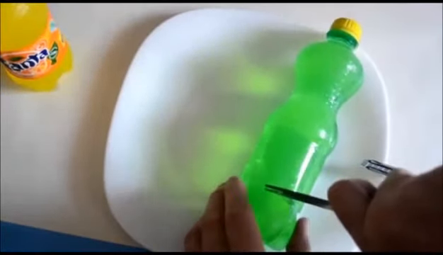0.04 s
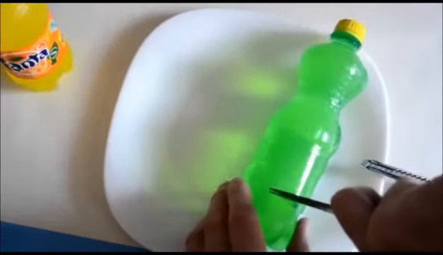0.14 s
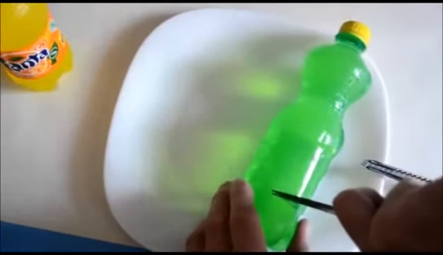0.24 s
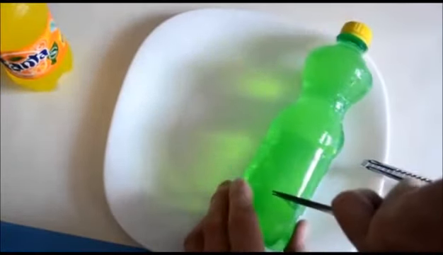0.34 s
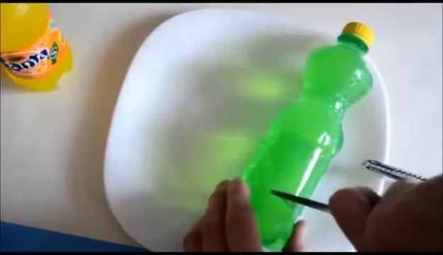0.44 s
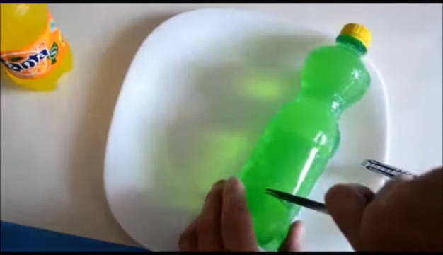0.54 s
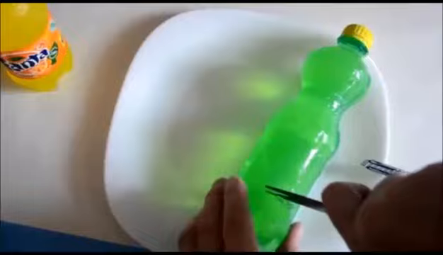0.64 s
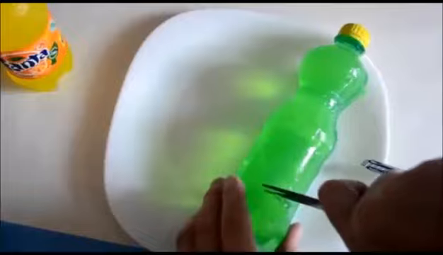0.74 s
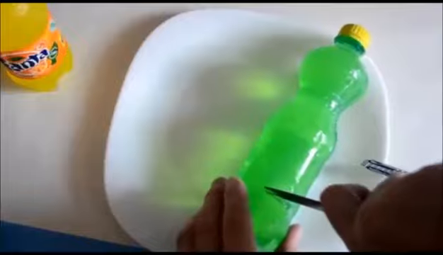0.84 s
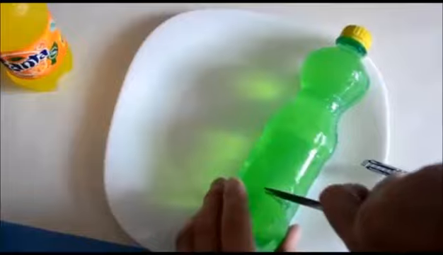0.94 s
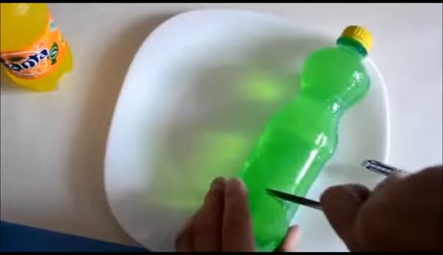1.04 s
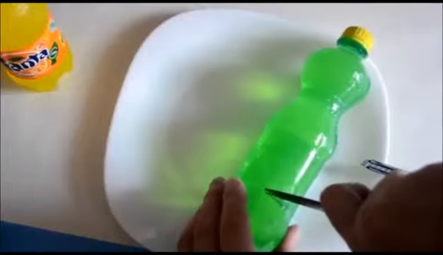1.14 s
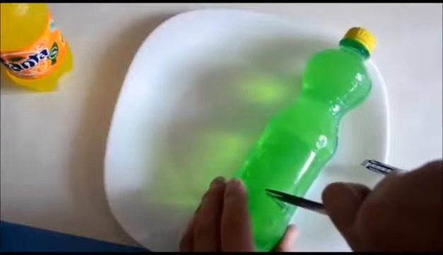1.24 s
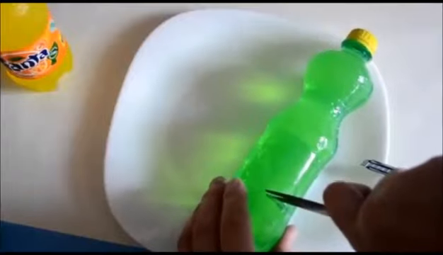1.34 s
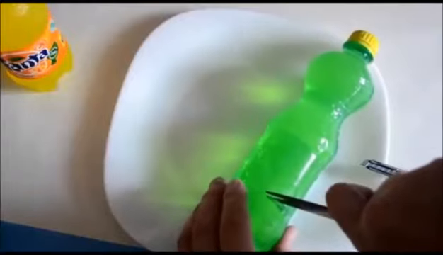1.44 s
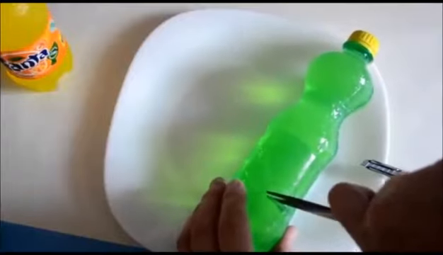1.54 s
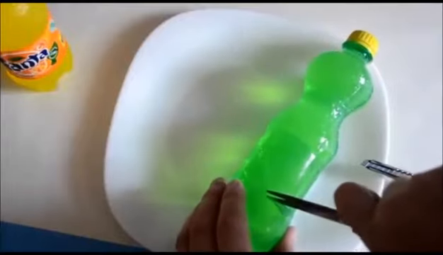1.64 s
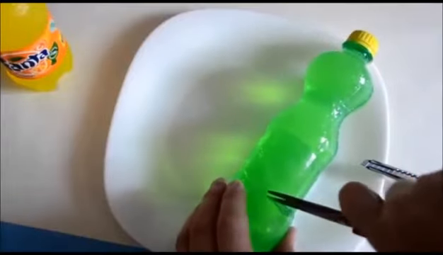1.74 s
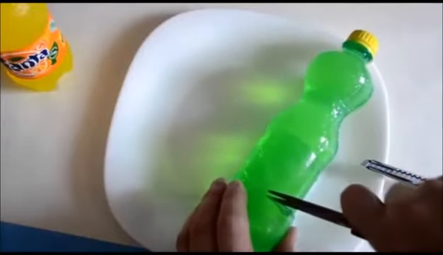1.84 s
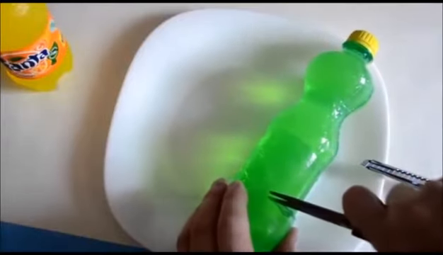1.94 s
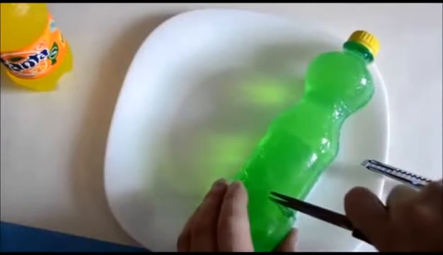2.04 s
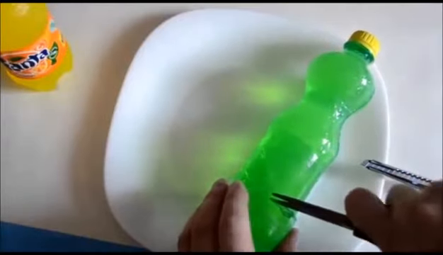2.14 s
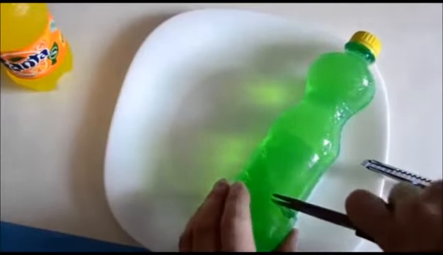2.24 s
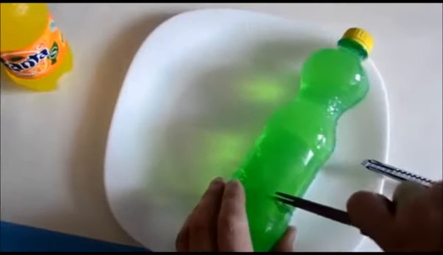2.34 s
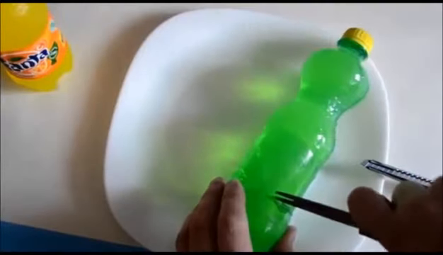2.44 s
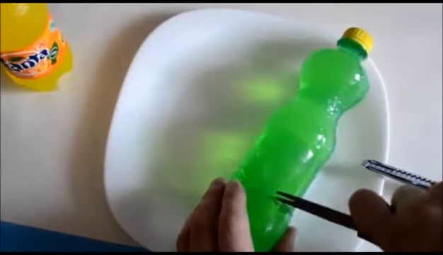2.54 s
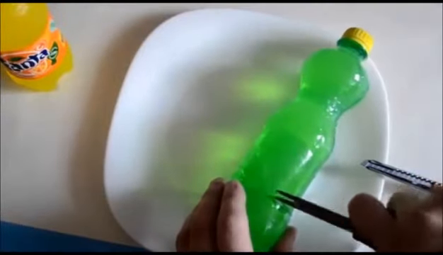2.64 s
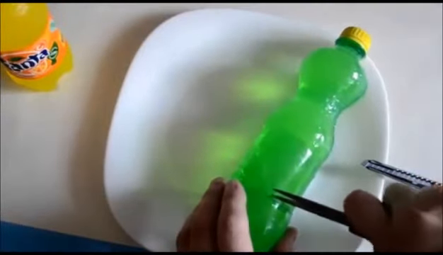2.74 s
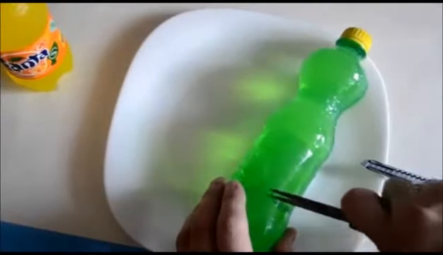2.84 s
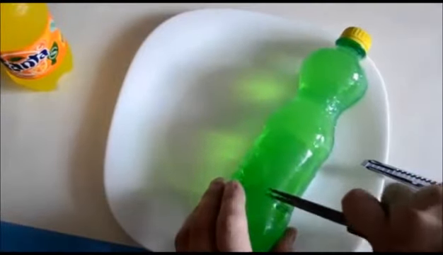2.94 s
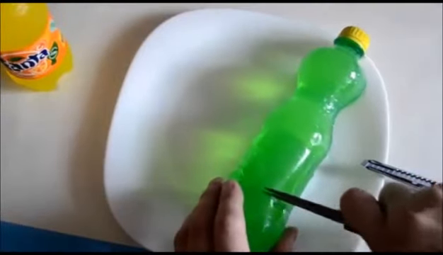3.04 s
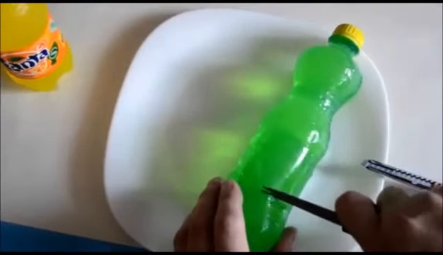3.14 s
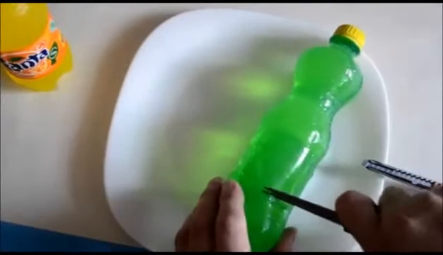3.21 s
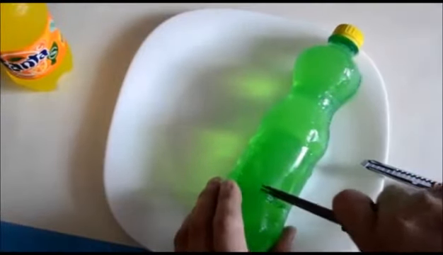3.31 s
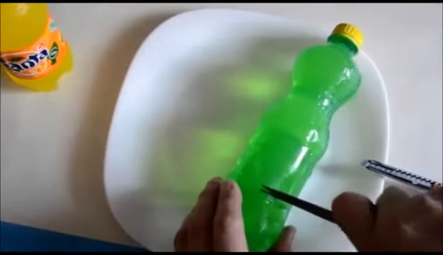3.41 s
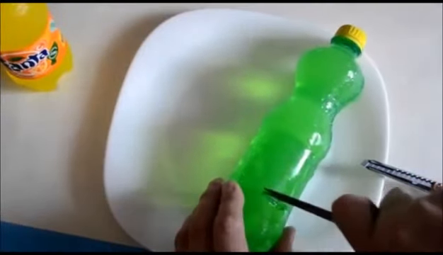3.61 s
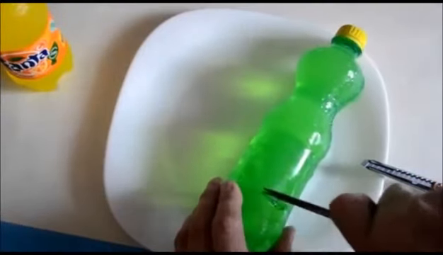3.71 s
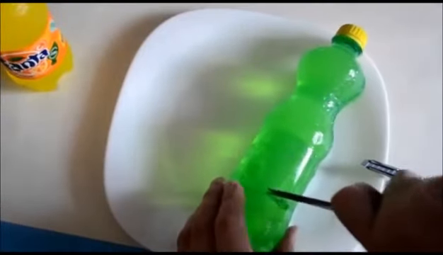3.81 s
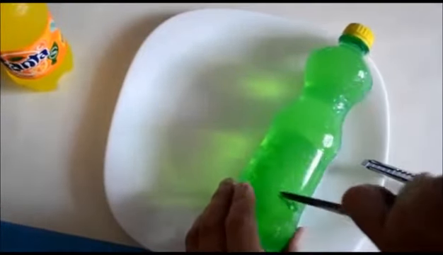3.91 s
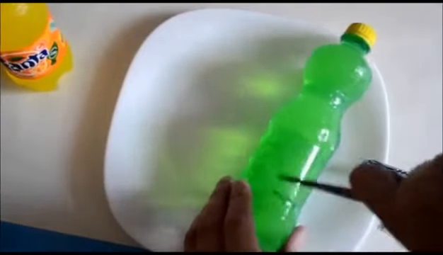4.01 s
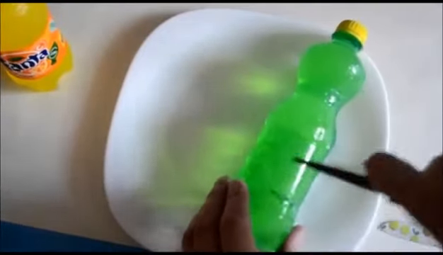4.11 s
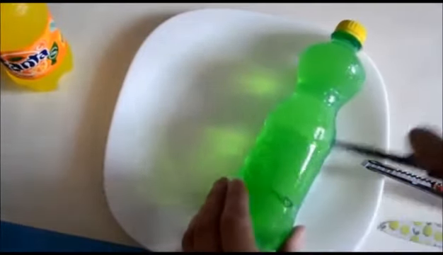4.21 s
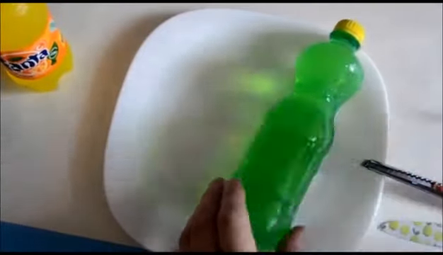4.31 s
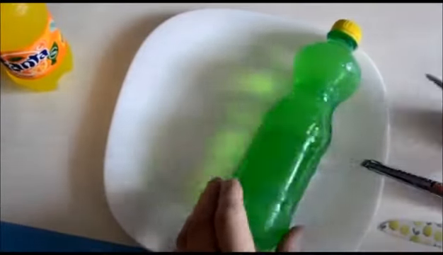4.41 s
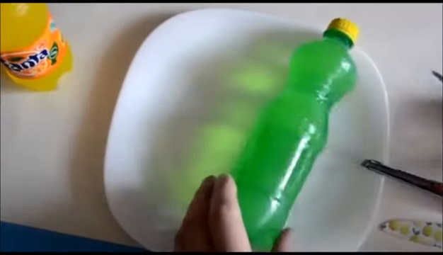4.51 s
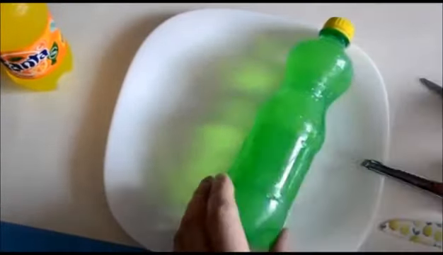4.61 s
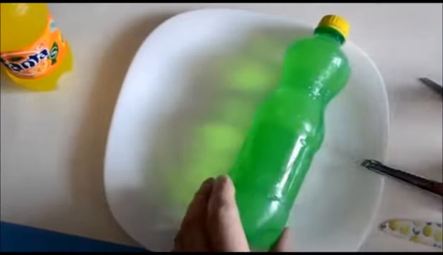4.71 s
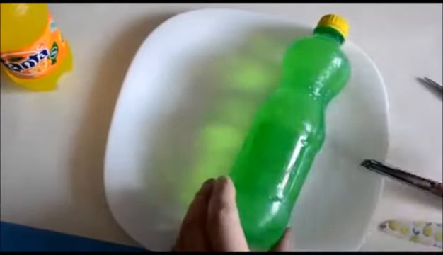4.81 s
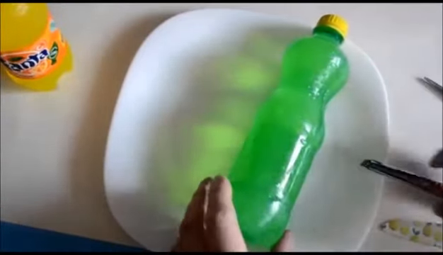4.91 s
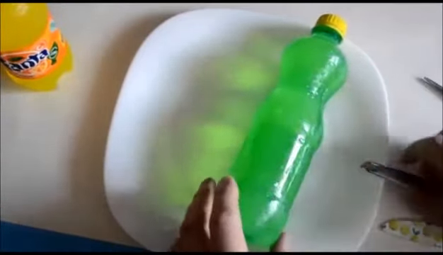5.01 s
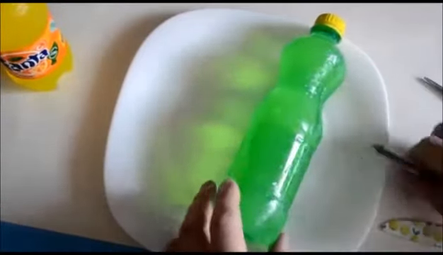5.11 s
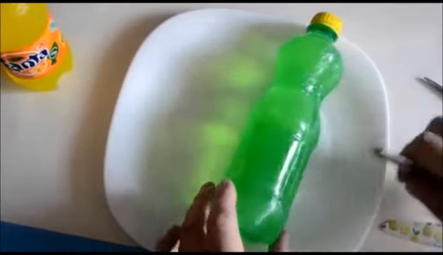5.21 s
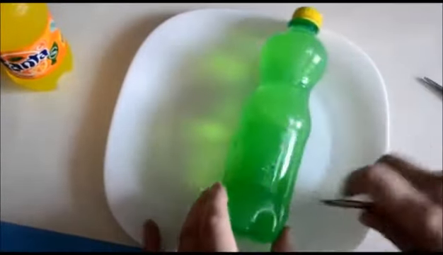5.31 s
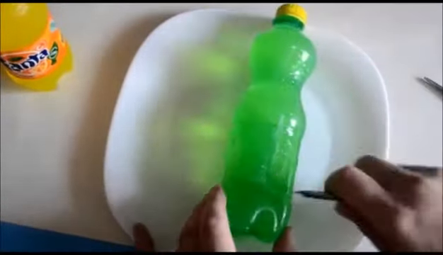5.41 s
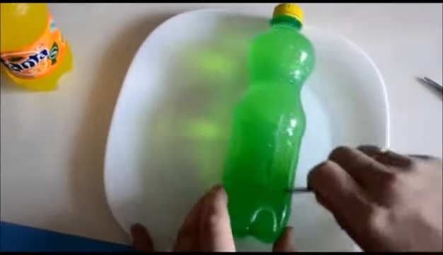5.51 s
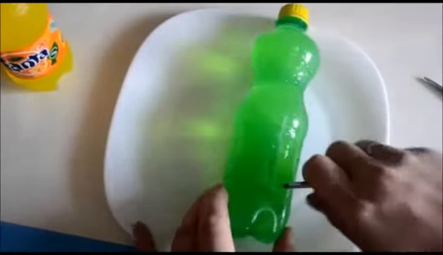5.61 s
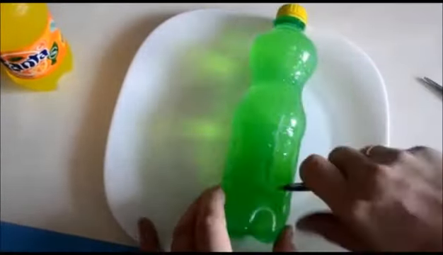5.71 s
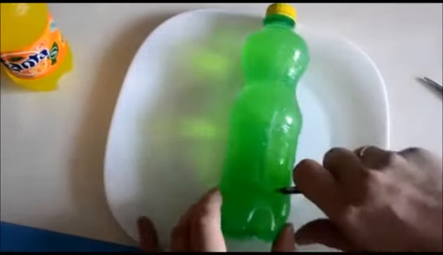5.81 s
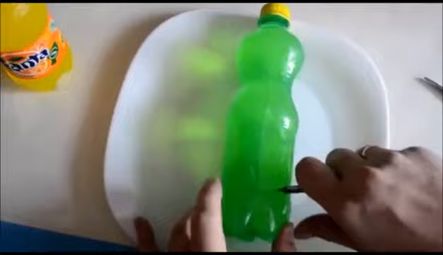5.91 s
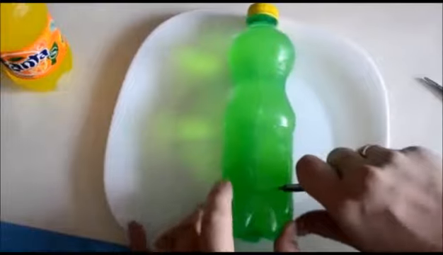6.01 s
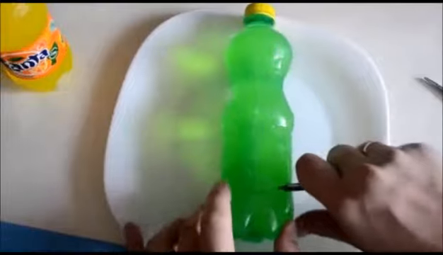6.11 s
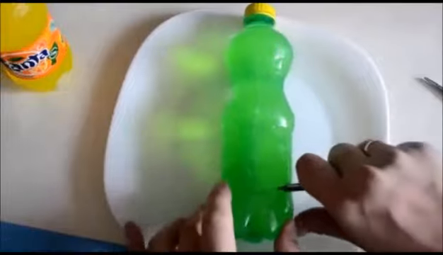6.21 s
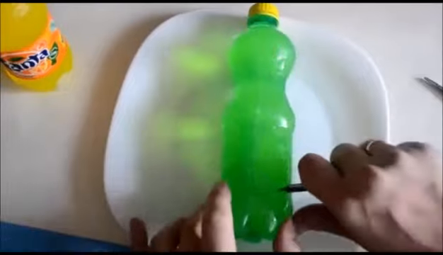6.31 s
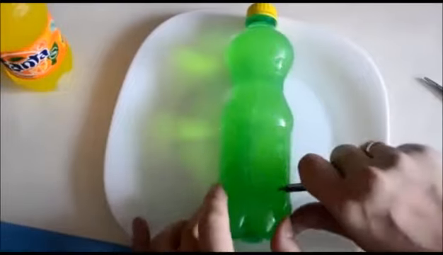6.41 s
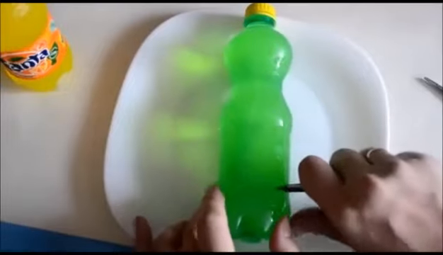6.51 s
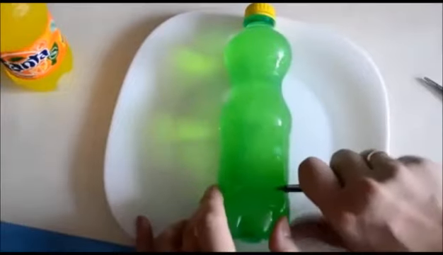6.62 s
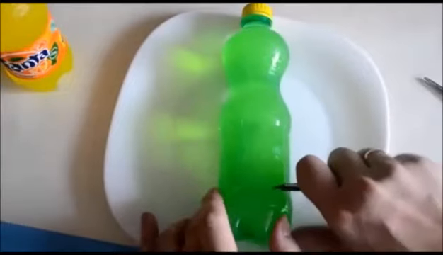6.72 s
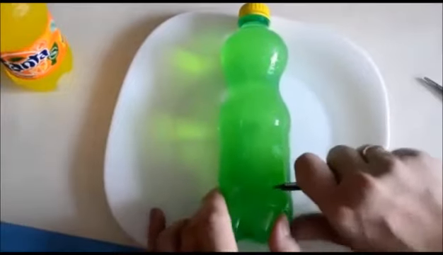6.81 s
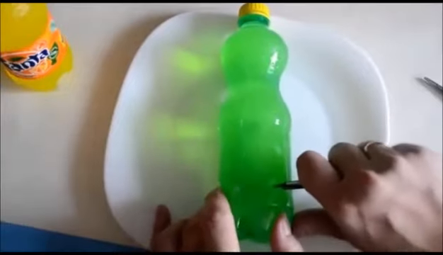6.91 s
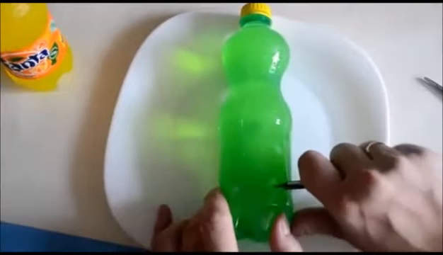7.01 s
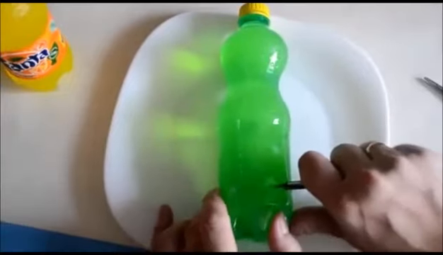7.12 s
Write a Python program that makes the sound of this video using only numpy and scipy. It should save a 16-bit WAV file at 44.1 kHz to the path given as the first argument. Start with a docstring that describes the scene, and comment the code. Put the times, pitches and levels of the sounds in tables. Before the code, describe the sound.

Sparse plastic pops and tiny scraping rasps sit over a low, steady room hiss. A strong snap comes early, then light ticks, a scissor clack and soft bottle bumps. Midway, scissors clatter onto a hard table, by far the loudest moment. A light brush and a thin steel click follow, then clustered crisp cracks as a knife enters the plastic. A small nearby microphone catches short indoor echoes.

```python
"""In a quiet room with a faint hum, small scissors snip the thin wall of a jelly-filled plastic bottle on a plate.
The wall gives way in short snaps and rasps, made by brief pushes or trains of slips ringing three resonances.
The heavy bottle thumps softly as it is shifted, and the scissors slide shut and clack: struck sets of modes.
Then the scissors are laid on the table in a run of knocks, ringing the table top, handles and blades.
A craft knife is picked up, its steel clicks, and it is pushed into the cut with more snaps and rasps."""
import sys
import numpy as np
from scipy import signal
from scipy.fft import rfft, irfft
from scipy.io import wavfile
from scipy.ndimage import uniform_filter1d

SR = 44100
rng = np.random.default_rng(int(sys.argv[2]) if len(sys.argv) > 2 else 0)


def to_wav(s):
    """Save 16-bit WAV."""
    ch = np.atleast_2d(s).T  # columns
    pcm = np.round(np.clip(ch, -1, 1) * 32767)  # PCM
    wavfile.write(sys.argv[1], SR, pcm.astype(np.int16))


N = 315315
CUTOFF_HZ = 11200   # about where the microphone stops hearing


def from_db(db):
    """Turns decibels into an amplitude factor."""
    return 10 ** (np.asarray(db) / 20)


def rms_one(x):
    """Scales a sound to an rms level of 1."""
    return x / np.sqrt(np.mean(x ** 2) + 1e-20)


def one_ms(x):
    """Scales a sound to the energy of one millisecond at rms 1."""
    return x * np.sqrt(SR / 1000 / (np.sum(x ** 2) + 1e-20))


def seconds(length):
    """The time of each sample, in seconds."""
    return np.arange(int(length * SR)) / SR


def at_hz(points, hz):
    """Reads a table between its rows, on a log-frequency axis."""
    points = np.array(points)
    return np.interp(np.log(np.maximum(hz, 1)), np.log(points[:, 0]), points[:, 1])


def cut(x, hz, kind):
    """Removes what lies above ("low") or below ("high") a frequency."""
    return signal.sosfilt(signal.butter(2, hz, kind, fs=SR, output="sos"), x)


def resonate(x, hz, quality):
    """Passes a sound through one resonance; a higher quality is narrower and rings longer."""
    b, a = signal.iirpeak(hz, max(quality, 1), SR)
    return signal.lfilter(b, a, x + 1e-18)


def add(track, s, sound):
    """Mixes a sound into the track at time s."""
    start = int(s * SR)
    track[start:start + len(sound)] += sound[:N - start]


def contact(rattle_s, rattle_db):
    """One sharp push and a quickly dying chatter of micro-slips, made equally strong at all frequencies."""
    t = seconds(.08)
    slips = rng.standard_normal(len(t)) * np.exp(-t / rattle_s)
    click = 1. * (t == 0)
    spectrum = rfft(one_ms(click) + from_db(rattle_db) * one_ms(slips))
    flat = irfft(spectrum / np.abs(spectrum), len(t))
    return flat[:len(t) // 2]


def strike(modes, push):
    """A push rings every mode of an object; neighbouring modes swing in opposite directions."""
    t, out = seconds(.3), 0
    for k, (hz, db, t60) in enumerate(modes):
        ring = np.sin(2 * np.pi * hz * t) * from_db(-60 * t / t60)
        out = out + (-1) ** k * from_db(db) * one_ms(ring)
    return one_ms(signal.fftconvolve(push, out))


def taps(events, modes, soft_hz, low_hz):
    """Light single blows on one object: no treble above soft_hz, and too small to radiate below low_hz."""
    out = np.zeros(N)
    for s, db in events:
        sound = strike(modes, contact(rattle_s=0.0043, rattle_db=3))
        sound = cut(cut(sound, soft_hz, "low"), low_hz, "high")
        add(out, s, from_db(db) * one_ms(sound))
    return out


# The tone of the room air. Each row: pitch in Hz, relative strength in dB.
AIR_TONE = [(25, -18), (60, -10.5), (100, -7), (135, -6), (180, -1.5), (400, -0.5), (1000, -3),
            (1800, -7.5), (2800, -10), (4700, -14.5), (6500, -21.5), (9500, -26), (11500, -36.5)]
# Faint steady whines in the air. Each row: pitch in Hz, width in Hz, level in dB.
AIR_WHINES = [(135, 2.7, -77), (393.6, 4.8, -79.5), (2228, 110, -79), (2658, 84, -77.5), (3040, 60, -77.5),
              (4500, 200, -78.5)]
AIR_DB = -63


def air():
    """Steady hiss with a low hum and a few narrow whines, all shaped from random noise."""
    hz = np.arange(N // 2 + 1) * SR / N
    hiss = irfft(rfft(rng.standard_normal(N)) * from_db(at_hz(AIR_TONE, hz)), N)
    out = from_db(AIR_DB) * rms_one(hiss)
    for hz, width, db in AIR_WHINES:
        quality = hz / width / 1.4   # wider than asked, as two passes make it narrower
        whine = resonate(resonate(rng.standard_normal(N), hz, quality), hz, quality)
        out += from_db(db) * rms_one(whine)
    return out


# How long the echoes last. Each row: pitch in Hz, time to fade by 60 dB in seconds.
ECHO_FADE = [(130, 0.95), (400, 0.39), (1000, 0.3248), (3000, 0.28), (6000, 0.32), (11000, 0.28)]
# The tone of the echoes. Each row: pitch in Hz, strength in dB.
ECHO_TONE = [(130, -4.1), (400, 0.9), (1000, 0), (3000, 0.2), (6000, -3), (11000, 1.1)]
ROOM_DB = -1


def room(x, build_s, early_s):
    """Reflections build up, hold while the near walls answer, then die away at a rate set by pitch."""
    t = seconds(.8)
    white = rfft(rng.standard_normal(len(t)))
    hz = np.arange(len(white)) * SR / len(t)
    centres = np.geomspace(100, 12800, 8)
    build = 1 - np.exp(-t / build_s)
    dying_s = np.maximum(t - early_s, 0)
    echo = 0
    for centre, share in zip(centres, np.eye(len(centres))):
        band = irfft(white * at_hz(np.c_[centres, share], hz), len(t))
        echo = echo + band * build * from_db(-60 * dying_s / at_hz(ECHO_FADE, centre))
    # a diffuse field has narrow peaks and dips, but its broad colour is smooth
    spectrum = rfft(echo)
    broad = np.sqrt(uniform_filter1d(np.abs(spectrum) ** 2, size=200))
    echo = irfft(spectrum / broad * from_db(at_hz(ECHO_TONE, hz)), len(t))
    return signal.fftconvolve(x, echo[:len(t) * 3 // 4])[:N]


# Hand and knife brush the table top. Each row: start in seconds, level in dB.
TABLE_BRUSHES = [(5.092, -47), (5.122, -49), (5.632, -51.5), (5.785, -55), (6.125, -53.5)]
# How the table top rings. Each row: pitch in Hz, strength in dB, time to fade by 60 dB in seconds.
TABLE_MODES = [(270, -18.5, 0.074), (385, -2.5, 0.017), (468, -1.5, 0.019), (965, -4, 0.032),
               (1115, 3.5, 0.0076), (1345, 2, 0.0061)]


def brushes():
    """A soft touch rings only the lower modes of the table top."""
    return taps(TABLE_BRUSHES, TABLE_MODES, soft_hz=404, low_hz=151)


# The full bottle bumps the plate. Each row: start in seconds, level in dB.
BOTTLE_THUMPS = [(.245, -40), (3.251, -49.5), (3.366, -42.5), (3.768, -40.5), (4.008, -44), (5.78, -44)]
# How the full bottle rings. Each row: pitch in Hz, strength in dB, time to fade by 60 dB in seconds.
BOTTLE_MODES = [(134, -9, 0.16), (173, -8, 0.019), (205.7, -5, 0.12), (350.2, -11, 0.23)]


def thumps():
    """The heavy bottle rings in a few low, muffled modes as it is shifted."""
    return taps(BOTTLE_THUMPS, BOTTLE_MODES, soft_hz=397.0, low_hz=99)


# The blades slide shut. Each row: start in seconds, level in dB.
BLADE_CLOSINGS = [(1.632, -64), (1.978, -54.5), (4.0062, -38), (4.415, -55)]
# How the blade tips ring. Each row: pitch in Hz, strength in dB, time to fade by 60 dB in seconds.
TIP_MODES = [(8360, -6, .008), (9200, -9, 0.0093), (9780, -21, .01), (10230, -6, 0.01)]


def closings():
    """The small steel tips ring very high as the blades slide shut."""
    return taps(BLADE_CLOSINGS, TIP_MODES, soft_hz=11000, low_hz=6000)


# The scissors' joint clacks as the blades jerk forward. Each row: start in seconds, level in dB.
SCISSOR_CLACKS = [(1.978, -33)]
# How the joint rings. Each row: pitch in Hz, strength in dB, time to fade by 60 dB in seconds.
JOINT_MODES = [(1340, -6, 0.0085), (1980, -7.5, 0.009), (3500, -1, 0.0047), (4700, -1.5, 0.0026)]


def joint_clacks():
    """The jerk of the blades rings the joint in a few short modes."""
    return taps(SCISSOR_CLACKS, JOINT_MODES, soft_hz=7000, low_hz=700)


# The craft knife's slider clicks. Each row: start in seconds, level in dB.
SLIDER_CLICKS = [(5.3668, -34), (5.4327, -45.5)]
# How the knife's steel rings. Each row: pitch in Hz, strength in dB, time to fade by 60 dB in seconds.
KNIFE_MODES = [(4320, -10, 0.044), (4560, 4, 0.059), (5000, -14, .06), (5800, -1, 0.023),
               (7400, -17, 0.023), (9070, -7, .02), (10230, -17, .015)]


def knife_clicks():
    """The click of the slider makes the thin steel ring brightly."""
    return taps(SLIDER_CLICKS, KNIFE_MODES, soft_hz=10000, low_hz=2000)


# The scissors are laid on the table. Each row: start in seconds, table level in dB,
# handle level in dB, fading time of the rattle in seconds, level sent to the room in dB.
SCISSOR_KNOCKS = [(4.4871, -14.5, -23.5, 0.0025, -1), (4.5849, -32.5, -17, 0.003, 0),
                  (4.652, -32.5, -25.5, 0.0024, 1.5), (4.7055, -26, -26, 0.00036, 4),
                  (4.7174, -35, -18, 0.0045, 2.5), (4.724, -18, -22.5, 0.0064, -16)]
# How the scissor handles ring. Each row: pitch in Hz, strength in dB, time to fade by 60 dB in seconds.
HANDLE_MODES = [(134, -15.5, 0.32), (220, -11.5, 0.078), (525, -4, 0.025), (708, 2.5, 0.016),
                (788, 2.5, 0.0082), (1054, -4, 0.0099), (1345, -4.5, 0.029), (1720, -2.5, 0.0023),
                (2310, -5, 0.0026), (2940, -10, 0.0077), (3630, -13, 0.0023)]
# How the scissor blades ring. Each row: pitch in Hz, strength in dB, time to fade by 60 dB in seconds.
BLADE_MODES = [(2850, -1, 0.004), (4000, 4, 0.0033), (5230, 1.5, 0.0026), (6600, -0.5, 0.0013),
               (9300, -5, 0.0011)]
BLADE_BUZZ_DB = -14   # the handles shake the blades; relative to the handles
# a harder blow is brighter: the cut-off at a given table level, and the dB that raise it an octave
CONTACT_HZ, CONTACT_AT_DB, CONTACT_DB_PER_OCTAVE = 2730, -9, 14


def knocks():
    """Each blow sounds the table top and the handles; the loose blades buzz on. Returns direct sound and room feed."""
    out = np.zeros((2, N))
    for s, table_db, handle_db, rattle_s, room_db in SCISSOR_KNOCKS:
        push = contact(rattle_s, rattle_db=-2.5)
        octaves = (table_db - CONTACT_AT_DB) / CONTACT_DB_PER_OCTAVE
        soft_hz = min(CONTACT_HZ * 2 ** octaves, CUTOFF_HZ)
        table = one_ms(cut(strike(TABLE_MODES, push), soft_hz, "low"))
        handles = strike(HANDLE_MODES, push)
        blades = strike(BLADE_MODES, contact(rattle_s=0.013, rattle_db=-1))
        sound = from_db(table_db) * table + from_db(handle_db) * handles
        sound += from_db(handle_db + BLADE_BUZZ_DB) * blades
        sound = cut(sound, 160, "high")
        add(out[0], s, sound)
        add(out[1], s, from_db(room_db) * sound)
    return out


# Some snaps make the whole shell buckle. Each row: start in seconds, level in dB.
SHELL_BUCKLES = [(.2346, -28), (.957, -39), (4.008, -43.5), (5.6285, -40.5), (5.7685, -38.5), (5.779, -55),
                 (5.8312, -43), (6.9006, -50)]
# How the shell rings. Each row: pitch in Hz, strength in dB, time to fade by 60 dB in seconds.
SHELL_MODES = [(994, -1.5, 0.026), (1069, 1, 0.014), (1130, -3, 0.0073), (1700, -30, 0.0041),
               (1900, -10, 0.0014)]


def buckles():
    """The plastic shell rings as a whole, lower than the small patch that snaps."""
    return taps(SHELL_BUCKLES, SHELL_MODES, soft_hz=3000, low_hz=493)


# A snapping or rubbed patch rings in flex, wall and edge. Each row: pitch in Hz at the usual pitch,
# strength in dB, power by which it follows the pitch, share of the brightness it gains.
PATCH_RESONANCES = [(1898, -5.5, 0.29, -0.95), (4220, -0.5, 1, -0.033), (7040, -1.5, 0.79, 0.99)]
USUAL_PITCH_HZ = 4200


def patch(push, pitch_hz, bright_db, quality, scale):
    """A pushed patch rings in broad resonances: tighter rings higher, a sharper crack favours the edge."""
    out = 0
    for k, (hz, db, follows, share) in enumerate(PATCH_RESONANCES):
        ring = resonate(push, hz * (pitch_hz / USUAL_PITCH_HZ) ** follows, quality)
        out = out + (-1) ** k * from_db(db + share * bright_db) * scale(ring)
    return out


# Edges drag over plastic and table. Each row: start in seconds, end in seconds, level in dB
# before the shared level_db, pitch in Hz, brightness in dB.
EDGE_RASPS = [ (0.203, 0.24, -76, 5900, 12), (.561, .622, -66, 3300, -3.5), (2.313, 2.342, -60.5, 6400, -4),
              (2.736, 2.781, -65.5, 5800, -3.5), (3.972, 4.023, -51, 5230, -4),
              (5.015, 5.073, -58.5, 5200, .5), (5.072, 5.094, -49.5, 3030, -2),
              (5.132, 5.154, -60.5, 4950, -2), (5.617, 5.635, -46.5, 2100, -3),
              (5.762, 5.783, -50, 2180, 2), (6.271, 6.302, -58, 2260, -5), (7.055, 7.15, -70, 4700, -8.5)]
RASP_QUALITY = 1.94


def rasps(slips_per_s, uneven_db, level_db):
    """The edge sticks and slips at random moments, thousands of times a second, each slip a tiny snap."""
    out = np.zeros(N)
    for start, end, db, pitch_hz, bright_db in EDGE_RASPS:
        length = max(end - start, .01)
        t = seconds(length + .01)   # room for the last ring
        stroke = np.interp(t / length, [0, .2, .85, 1], [0.37, 0.93, 0.8, 0.15])
        born, size, sign = rng.random((3, len(t)))
        slips = (born < slips_per_s / SR) * np.sign(sign - .5) * from_db(uneven_db * size)
        push = cut(slips * stroke, 600, "high")
        sound = patch(push, pitch_hz, bright_db, RASP_QUALITY, rms_one)
        add(out, start, from_db(db + level_db) * sound)
    return out


# Sharp cracks of the wall, and one of the scissors as they are laid down (at 4.7188 s).
# Each row: start in seconds, level in dB (energy against one millisecond at rms 1),
# pitch in Hz, brightness in dB, quality of the resonances, level sent to the room in dB.
SNAPS = [ (0.197, -56, 5300, 11.5, 5.4, -15), (0.2345, -19.5, 3850, -5.5, 1.83, -2.5),
         (0.7775, -45.5, 3300, -2, 3.6, -3), (0.9366, -50, 5400, -2, 1.5, 0),
         (0.9524, -34.5, 3300, 0.5, 3.2, -9), (0.9567, -29, 3730, -0.5, 1.17, 0),
         (1.2006, -54, 4600, -5, 1.5, 1), (1.632, -49.5, 6500, -1.5, 1.4, -6),
         (2.3812, -57, 5600, 3, 5.5, -8), (2.4593, -63, 5800, 5, 3, -7),
         (3.809, -49.5, 3800, -1.5, 3.5, -3), (3.8891, -48, 4000, 0, 2.9, -1.5),
         (4.0065, -39.5, 5840, 9, 9.7, -28), (4.1416, -48, 3200, -3, 2.3, -6),
         (4.415, -48, 4160, -4, 4.1, -5), (4.7188, -22, 2190, -7.5, 4.5, -2.5),
         (5.028, -48, 5560, -1.5, 1.2, -19), (5.205, -54.5, 3500, -8, 6, -2),
         (5.367, -40.5, 4560, 6, 2.8, 1), (5.433, -49.5, 4650, 4, 4.1, -0.5),
         (5.5865, -42.5, 4930, 4, 4, 6), (5.5999, -42.5, 5600, -2, 3.9, -1),
         (5.6028, -41.5, 6000, 3.5, 8, -1.5), (5.6162, -38, 4120, 2, 8.7, 0.5),
         (5.628, -29, 4500, -3, 7.7, -7.5), (5.769, -31.5, 4800, -3.5, 6.9, -7),
         (5.7798, -31, 4000, 1, 1.76, 3.5), (5.8314, -40.5, 4000, -9, 2, -0.5),
         (5.948, -34.5, 4200, 3.5, 3.7, -3), (6.0609, -40.5, 4630, 2, 3.4, 0),
         (6.2876, -47.5, 4700, 1, 3.7, -2.5), (6.413, -47, 5000, -2, 1.4, -2),
         (6.7571, -56, 4640, 2, 2.9, 0.5), (6.901, -36.5, 3780, -3.5, 3.8, -2.5)]
CHATTER_S, CHATTER_DB = 0.0012, 3.5   # micro-slips that follow each crack


def snaps():
    """A sharp crack rings a small patch, which radiates no bass. Returns direct sound and room feed."""
    out = np.zeros((2, N))
    for s, db, pitch_hz, bright_db, quality, room_db in SNAPS:
        push = cut(contact(CHATTER_S, CHATTER_DB), 470, "high")
        sound = from_db(db) * patch(push, pitch_hz, bright_db, quality, one_ms)
        add(out[0], s, sound)
        add(out[1], s, from_db(room_db) * sound)
    return out


def scene():
    """Everything is heard directly; snaps, knocks and lighter sounds each have their own room echoes."""
    out = air()
    light = brushes() + thumps() + closings() + knife_clicks() + buckles()
    light += rasps(slips_per_s=2400, uneven_db=7.5, level_db=-1.5)
    joint = joint_clacks()
    light_pair = (light + joint, light + from_db(-4.0) * joint)   # the joint feeds the room less
    for direct, feed in (light_pair, knocks(), snaps()):
        out = out + direct + from_db(ROOM_DB) * room(feed, build_s=0.004, early_s=0.018)
    return out[None]


def record(dry):
    """A small microphone: thin bass, a dip near 8 kHz, and no top."""
    dipped = dry - 0.67 * resonate(dry, hz=7940, quality=10.8)
    thin = cut(dipped, 38, "high")
    rounded = signal.sosfilt(signal.butter(8, CUTOFF_HZ - 400, fs=SR, output="sos"), thin)
    return signal.sosfilt(signal.cheby1(10, .5, CUTOFF_HZ - 300, fs=SR, output="sos"), rounded)


dry = scene()
out = record(dry)
to_wav(out)
```